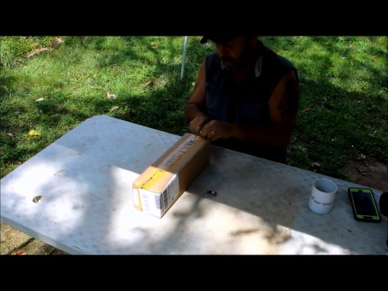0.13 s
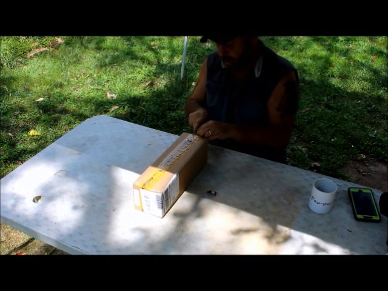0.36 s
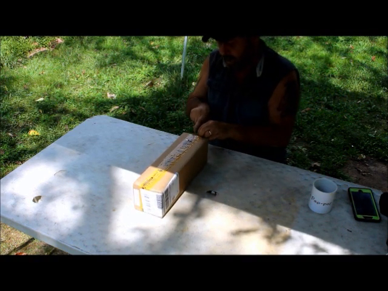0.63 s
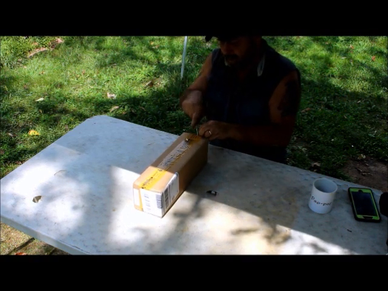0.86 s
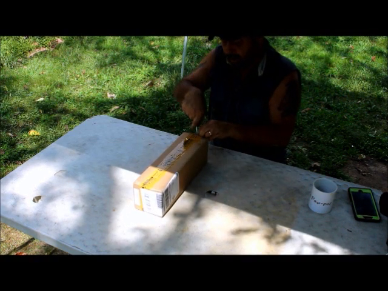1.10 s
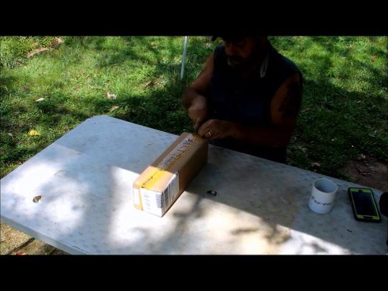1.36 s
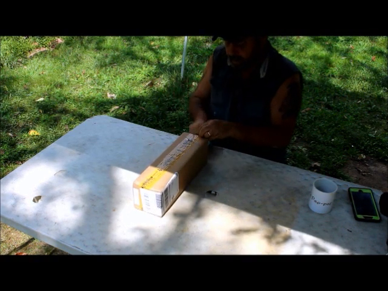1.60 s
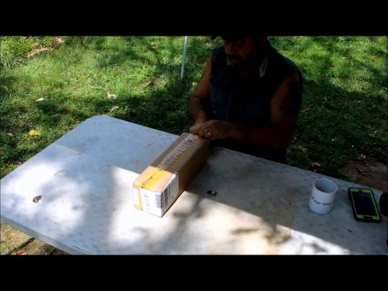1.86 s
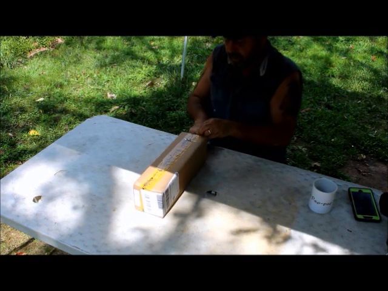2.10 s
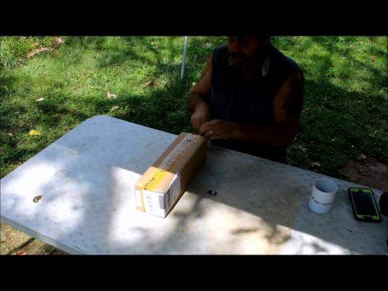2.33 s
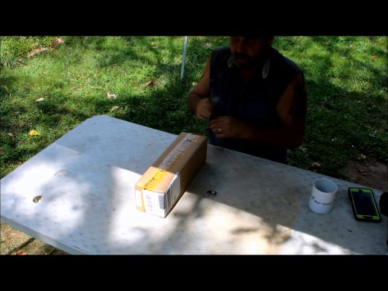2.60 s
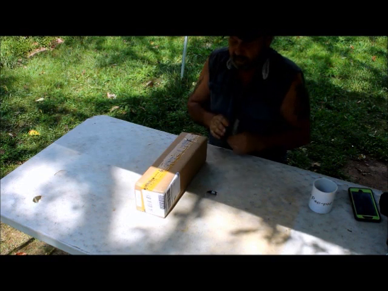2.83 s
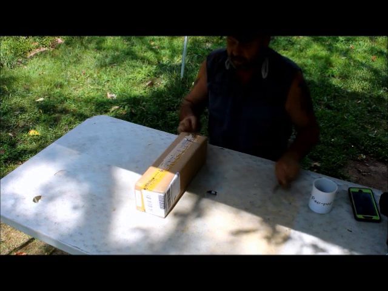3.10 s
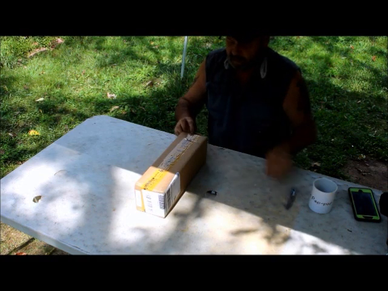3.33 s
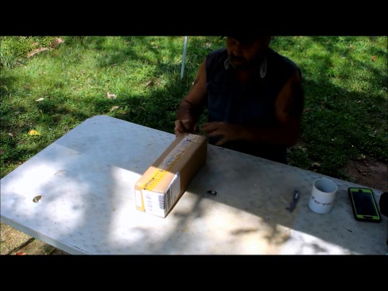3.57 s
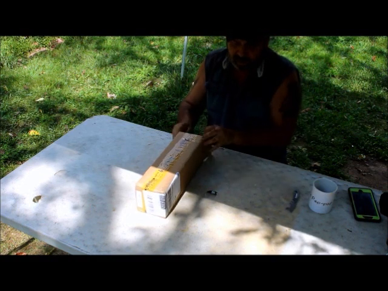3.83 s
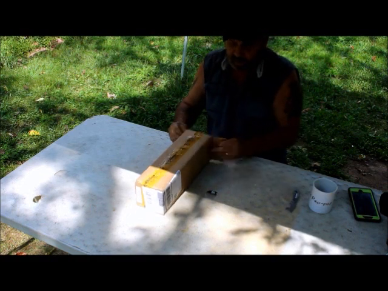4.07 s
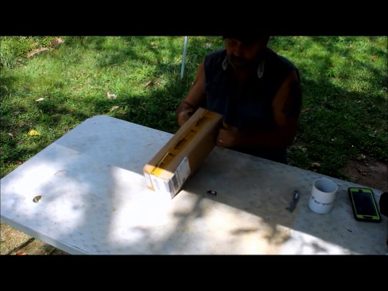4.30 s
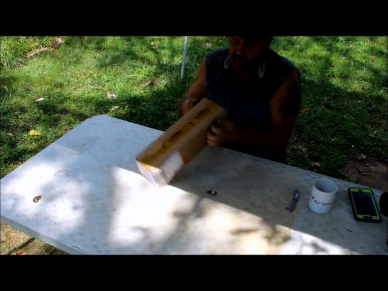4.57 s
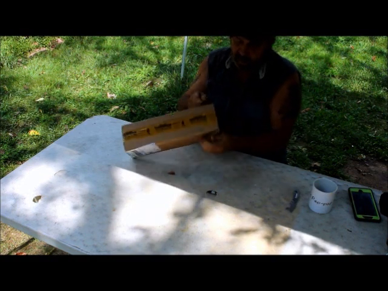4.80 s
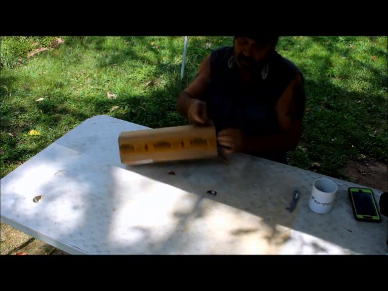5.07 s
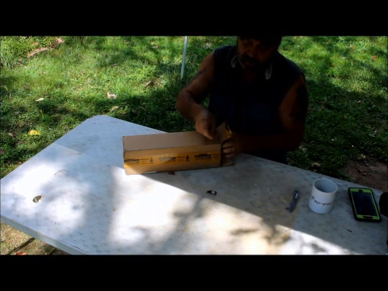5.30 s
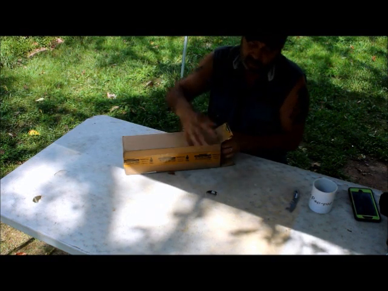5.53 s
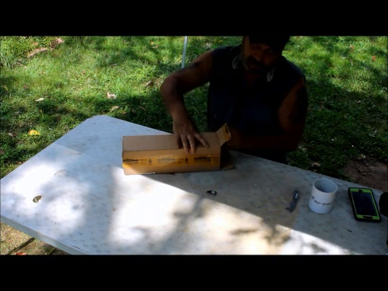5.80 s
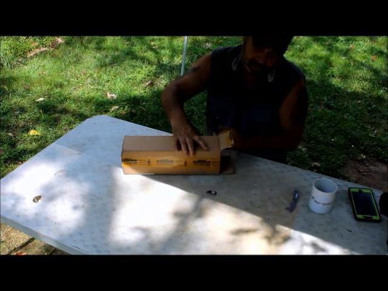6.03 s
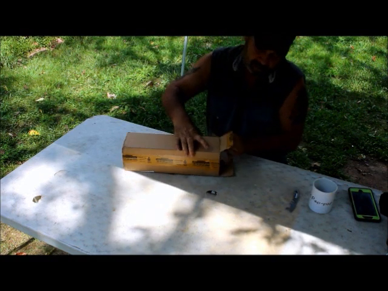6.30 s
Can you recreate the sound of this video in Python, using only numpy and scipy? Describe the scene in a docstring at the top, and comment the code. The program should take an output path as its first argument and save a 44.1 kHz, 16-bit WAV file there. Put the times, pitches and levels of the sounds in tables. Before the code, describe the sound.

Close and dry, outdoors: a blade makes short rasping cuts and hollow knocks in a taped cardboard box on a plastic folding table, with one very loud stab. The knife is dropped and rattles briefly. The box is then scraped, turned over and set down with a boomy thud, and its flaps are tugged with papery crackle. Crickets, ticking katydids and a rising cicada run behind, over faint distant traffic.

```python
"""Outdoors: crickets, a buzzing katydid, a swelling cicada and far traffic (noise bands) fill the air.
Over them a cardboard box on a plastic folding table is knocked, stabbed and slit with a knife, the knife
is dropped, the box dragged and turned over, its flaps pulled; a nearer katydid files pulses. Blows and
stick-slip clicks drive damped modes; paper crackle is filtered clicks. The recorder ducks after loud blows
and limits peaks by clipping."""
import sys
import numpy as np
from scipy import signal
from scipy.fft import rfft, irfft
from scipy.io import wavfile
from scipy.ndimage import uniform_filter1d

SR = 44100
rng = np.random.default_rng(int(sys.argv[2]) if len(sys.argv) > 2 else 0)


def voltage_ratio(decibels):
    """Convert decibels (scalar or array-like) to amplitude ratios, 20 dB per decade."""
    exponent = np.asarray(decibels, float) / 20
    return 10 ** exponent


def to_wav(s):
    """Save 16-bit WAV."""
    ch = np.atleast_2d(s).T  # columns
    pcm = np.round(np.clip(ch, -1, 1) * 32767)  # PCM
    wavfile.write(sys.argv[1], SR, pcm.astype(np.int16))


N = 282681
TIME_S = np.arange(N) / SR

# insect swells: t/s, cricket chorus level/dB, cicada level/dB
INSECTS = [(0.0, -55.5, -61.5), (1.4, -54, -58), (2.5, -53.5, -54.5), (3.7, -54, -50.5),
           (4.7, -54.5, -45.5), (5.7, -51, -43.5), (6.41, -55, -42.5)]
# cicada resonances: f/Hz, width/Hz, relative level/dB
CICADA = [(3590, 270, -6.5), (4790, 2360, -0.5), (5600, 920, -5.5), (6570, 1300, -2.5), (7560, 800, -3),
          (8070, 2100, -3.5)]
# buzzing katydid: t/s, level/dB
FAR_KATYDID = [(0, -61.5), (3.3, -62), (5.7, -56.5), (6.41, -63)]
# its beat, slowing a little: t/s, buzzes begun/count
BUZZ_COUNT = [(-.025, 0), (1.06, 8), (2.32, 17), (3.155, 23), (3.59, 26), (5.48, 39), (6.5, 46)]
# four-pulse katydid: t/s, level/dB
NEAR_KATYDID = [(1.0584, -45.5), (1.2474, -43.5), (1.4624, -43.5), (1.6811, -43), (1.8996, -43),
                (2.139, -47), (2.367, -41), (2.5713, -42), (2.793, -41.5), (3.019, -42), (3.29, -45),
                (3.538, -44), (3.794, -43), (4.019, -41.5), (4.2647, -40.5), (4.4976, -43), (4.7404, -43),
                (4.967, -42), (5.1931, -40.5)]
# pulse starts within one call: t/s
PULSE_S = [0, .0105, .021, .0345]
# traffic and air spectrum: f/Hz, relative level/dB per Hz
AIR = [(15, -54), (25, -8), (114, -0.5), (263, 0), (714, -9.5), (2550, -17.5), (3920, -19.5), (4740, -18.5),
       (5430, -16.5), (9840, -22), (11000, -32), (14800, -38.5), (16000, -70)]
# box standing on the table top: f/Hz, relative level struck/dB, t60/s, relative level rubbed/dB
BOX_MODES = [(89, 19.5, 0.064, 4.5), (117, 7, 0.24, -2), (127.8, -4.5, 0.43, -2.5), (152, 0, 0.15, -2),
             (174, -4, 0.1, -23), (228, 16, 0.11, 6), (273, 8.5, 0.21, -1.5), (314.8, -21, 0.25, -9),
             (369, -14, 0.081, -4), (407, -1.5, 0.069, 4.5), (456, -1, 0.17, -3), (522, 8.5, 0.034, 5),
             (582.6, -24, 0.085, -4.5), (659, -1.5, 0.06, -8), (738, 1, 0.03, 0), (873, -0.5, 0.026, -1),
             (985, -15.5, 0.023, -3.5), (1091, -13.5, 0.051, -10), (1205, -16, 0.018, -10),
             (1428, 8, 0.013, 4), (1615, 1.5, 0.018, 1), (1840, 6, 0.015, 7.5), (2036, -23, 0.022, 9),
             (2303, -8, 0.044, 0.5), (2634, 0.5, 0.018, 0), (2936, -52, 0.052, 0), (3750, -1.5, 0.016, -7)]
# table top under the knife: f/Hz, relative level/dB, t60/s
TABLE_MODES = [(147, 0, 0.047), (214, -18, 0.11), (233, 19, 0.069), (337, 6, 0.14), (394, 7, 0.24),
               (462, 15, 0.061), (554, 14, 0.087), (654, 14.5, 0.01), (755, 12, 0.057), (876, 16.5, 0.021),
               (1030, 4.5, 0.038), (1165, -1, 0.035), (1285, -8.5, 0.036), (1468, -10.5, 0.061),
               (1704, -9, 0.025), (1920, 0.5, 0.0095), (2250, 3, 0.016), (2475, 1.5, 0.022),
               (2700, -6, 0.026), (2980, -9, 0.029), (3120, -15, 0.03), (3500, -4.5, 0.0071),
               (3980, -9, 0.018), (4200, -16, 0.016), (4520, 2, 0.0069), (5100, -9, 0.0097)]
# blows on the box: t/s, relative wall ring/dB, hardness (edges over walls)/dB,
# weight (boom over walls)/dB, relative crack/dB
KNOCKS = [(0.0534, -45, 7, -18, -31), (1.2137, -36, 5, -12, -50), (1.3174, -40, 7.5, -15, -36),
          (1.3808, -52, -8, -11, -34), (1.4317, -36, 4, -1, -53), (1.509, -49, 8, -1, -29.5),
          (1.5374, -30.5, -25, -8, -42), (1.6851, -23.5, -3, -15, -21), (1.9403, -29.5, 3.5, -21, -26),
          (2.0522, -44, -1, 4, -32), (2.1404, -24, 1, 8, -21.5), (2.147, 4, -4.5, -16, -14.5),
          (2.1568, -21.5, 10, 10, -33), (2.1619, -20, 9.5, 1.5, -22), (2.3524, -23.5, -10, -2.5, -37),
          (2.3853, -30.5, -12, -9, -30), (2.4648, -53, 13, 14, -31.5), (2.5254, -49, 14, 4, -46),
          (2.5814, -48, 16, 4.5, -45), (2.6592, -48, 15, 2, -42), (3.0214, -56, 23, -5, -45),
          (3.706, -41.5, -11, 0, -45), (3.81, -23, -4, 0, -21), (4.3327, -30, -18, -23, -27),
          (4.5084, -13.5, -8, -25, -26), (4.5529, -29.5, 0, -20, -45), (5.1658, -34.5, -3, -3, -32),
          (5.2053, -27.5, 0, -15, -42), (5.7853, -32.5, 2, -15, -26), (5.8574, -24.5, -12, -25, -22),
          (5.878, -25, -4, -18, -17), (5.8996, -44, 3, -13, -36), (5.9177, -32, -5, -22, -16.5),
          (5.9588, -38, 7, -13, -25), (6.001, -27.5, -4, -15, -20.5), (6.2291, -37.5, 8, -5, -34)]
# turned box lands flat and rocks: t/s, wall ring/dB, hardness/dB, weight/dB, crack/dB, as KNOCKS
LANDINGS = [(5.2539, -12, -6.5, -4.5, -35), (5.2866, -36.5, 14, 6, -21), (5.3105, -58, 11, -1, -40),
            (5.3447, -19, -9, 1, -36), (5.3809, -33, 9.5, 1.5, -30)]
# knife lands and rattles to rest: t/s, wall ring/dB, hardness/dB, weight/dB, crack/dB, as KNOCKS
DROPS = [(3.3015, -4.5, 0.5, -12, -8.5), (3.3357, -23.5, -14, 6, -29), (3.3416, -17.5, 0, -25, -23),
         (3.3548, -8, -6, -28, -29), (3.3663, -18.5, 4, -18, -18.5), (3.3784, -15, -25, -6, -27),
         (3.3885, -18.5, 2, -7, -29), (3.4232, -11.5, 0, -4, -15.5), (3.4444, -19.5, -5, -25, -31),
         (3.463, -29.5, 3, 4, -44), (3.5236, -33, -5, 1, -26)]
# limits between mode groups, struck (deep boom, boom, wall, edge): f/Hz
STRUCK_EDGES_HZ = [170, 280, 1250]
# limits between mode groups, rubbed (deep boom, boom, long wall, short wall, edge): f/Hz
RUBBED_EDGES_HZ = [170, 280, 670, 1250]
# paper crackle spectrum: f/Hz, relative level/dB per Hz
CRACKLE = [(2500, -3), (3300, -2), (4600, -3), (7000, -5.5), (9000, -6.5), (11000, -12), (13000, -19.5),
           (15500, -38)]
# blade through tape and board: start t/s, hold/s, relative level/dB, brightness/dB, weight/dB
# (the last two scaled per part by the shares below)
CUTS = [(1.215, 0.031, -41.5, 4, -5), (1.29, 0.038, -50.5, 4, -10), (1.35, 0.066, -49.5, 1, -9),
        (1.425, .015, -29.5, -12.5, -10), (1.455, 0.027, -46, -6, -9), (1.51, .005, -50, 4, -8),
        (1.555, 0.015, -45, -14, 4), (1.688, 0.03, -32, 3, -11), (1.715, 0.017, -32.5, .4, 5),
        (1.905, 0.021, -48, 7, -8), (1.93, 0.025, -28, -1, -10), (2.058, 0.0075, -40.5, 1.5, -16),
        (2.134, 0.0065, -39, 2.5, -15), (2.17, 0.015, -39.5, 0, -9), (2.32, .015, -37.5, -11, -3),
        (2.347, 0.035, -29.5, -15, -8.5), (2.524, .005, -53, 14, -8), (2.598, .008, -49, 11.5, -5),
        (2.666, 0.0056, -53.5, 13, -9), (3.02, 0.068, -62.5, 20.5, -2)]
# knife and box shift on the table top: start t/s, hold/s, level/dB, brightness/dB, weight/dB, as CUTS
DRAGS = [(1.12, 0.4, -63, 2, 1), (1.75, 0.25, -54, 0, 12.5), (2.3, 0.78, -66.5, 14, 14),
         (3.47, 0.017, -29, -25, -29), (3.52, 0.13, -45.5, -13, -2), (4.2, .09, -38.5, 5.5, -20),
         (4.31, 0.09, -38, 6.5, -21), (4.42, .03, -58, 6, 5), (4.46, 0.047, -51, 20, -3),
         (4.53, 0.13, -49.5, 15, 4.5), (4.645, 0.047, -39.5, 6.5, -5), (4.715, 0.035, -35.5, 4.5, 8),
         (4.765, 0.074, -29, -2.5, -8), (4.84, 0.023, -34.5, -6, 3), (4.885, 0.025, -44.5, 1, 12),
         (4.87, 0.055, -56, 11, .3), (4.95, 0.092, -52.5, -10, 12), (5.0, 0.011, -53, 16.5, -3),
         (5.09, 0.034, -50, 0, 5), (5.135, .06, -45.5, -8, -6), (5.2, 0.043, -38.5, -1, -11),
         (5.285, 0.0095, -42, 15, 4), (5.305, 0.02, -37, 3.5, 10.5), (5.36, 0.033, -42, 4.5, 7),
         (5.48, 0.019, -48.5, 4, 8.5), (5.55, 0.03, -48.5, -8, 9)]
# fingers work tape and flaps: start t/s, hold/s, level/dB, brightness/dB, weight/dB, as CUTS
PULLS = [(3.745, 0.041, -45, -0.2, -9), (3.83, .13, -51, 0.5, -0.5), (4.03, 0.023, -50.5, 5.5, -7),
         (4.05, 0.072, -55.5, 7, -1), (4.155, 0.0056, -54, 12, -5), (5.73, 0.1, -52, 9, 6),
         (5.81, 0.026, -47, -3, -5), (5.855, 0.058, -40.5, 0, -5), (5.912, 0.01, -41, -4, 5),
         (5.955, 0.012, -46, 6, 0), (6.005, 0.022, -47.5, 8, 4), (6.05, 0.023, -47.5, 3, 4),
         (6.09, 0.035, -45, -7.5, 8.5), (6.16, .02, -48, -4, 12.5), (6.21, 0.088, -46.5, -5, 3.5),
         (6.32, 0.037, -56.5, 4, 3), (6.385, .03, -54, 8.5, 7)]
# per kind of stroke: rise/(dB/s), fall/(dB/s),
# [paper crackle, deep boom, boom, long wall, short wall, edge] relative level/dB
CUT_TOUCH = 820, 1060, [-21, -1.5, -0.5, -0.5, -3.5, -11]
DRAG_TOUCH = 430, 245, [-21.5, -2, -5.5, -1, -7, -9]
PULL_TOUCH = 550, 880, [-10, -5.5, -3.5, -1, -4.5, -6]
# how far each of those six parts follows brightness, and weight: share/1
BRIGHT_SHARE = [.8, 0.071, 0.038, 0, 0.57, 0.72]
WEIGHT_SHARE = [0, 0.93, 0.74, 0.11, 0.19, 0.15]


def unit(x):
    """Scale to rms 1."""
    return x / np.sqrt(np.mean(x ** 2))


def colour(x, points):
    """Shape a spectrum by (f/Hz, level/dB) points, interpolated over log frequency."""
    hz, db = np.transpose(points)
    log_f = np.log(np.arange(N // 2 + 1) * SR / N + 1)
    return irfft(rfft(x) * voltage_ratio(np.interp(log_f, np.log(hz), db)), N)


def ring(x, hz, t60_s):
    """One damped mode: each impulse starts a decaying sine."""
    pole = np.exp(2j * np.pi * hz / SR - np.log(1000) / (t60_s * SR))
    return signal.lfilter([1], [1, -pole], x).imag


def band(hz, width_hz):
    """Noise of rms 1 through one resonance twice."""
    t60_s = np.log(1000) / (np.pi * width_hz)
    once = ring(rng.standard_normal(N), hz, t60_s)
    return unit(ring(once, hz, t60_s))


def walk(rate_hz):
    """Slow random wander of rms 1: noise averaged twice."""
    k = int(SR / rate_hz)
    return unit(uniform_filter1d(uniform_filter1d(rng.standard_normal(N), k), k))


def low_cut(x, hz):
    """Steep high-pass."""
    return signal.sosfilt(signal.butter(4, hz, "high", fs=SR, output="sos"), x)


def fade(x, tau_s):
    """Every impulse dies away exponentially."""
    return signal.lfilter([1], [1, -np.exp(-1 / (tau_s * SR))], x)


def slips(rate_hz, spread_db):
    """Stick-slip clicks at random moments, mostly small, a few large; rms 1."""
    spreads = np.minimum(rng.exponential(size=N), 5.5)  # caps the largest slip
    size = voltage_ratio(spread_db * spreads) * rng.choice([-1, 1], N)
    return unit(size * (rng.random(N) < rate_hz / SR))


def shares(hz, db, edges_hz):
    """Group of each mode as a part column (deep boom = 2), and its amplitude share of the group's power."""
    group = 2 + np.searchsorted(edges_hz, hz)
    total = np.sqrt([np.sum(voltage_ratio(db[group == g]) ** 2) for g in group])
    return group, voltage_ratio(db) / total


def chorus():
    """Many crickets blur into one wavering band; the cicada rasps over several resonances."""
    s, cricket_db, cicada_db = np.transpose(INSECTS)
    crickets = voltage_ratio(0.73 * walk(7.9) + 1.3 * walk(80)) * band(4710, 750)
    cicada = unit(sum(voltage_ratio(db + 1.9 * walk(41)) * band(hz, width_hz) for hz, width_hz, db in CICADA))
    cricket_gain = voltage_ratio(np.interp(TIME_S, s, cricket_db))
    cicada_gain = voltage_ratio(np.interp(TIME_S, s, cicada_db))
    return cricket_gain * crickets + cicada_gain * cicada


def far_katydid(duty=0.39):
    """Resonant noise gated on a nearly even beat."""
    beat = np.interp(TIME_S, *np.transpose(BUZZ_COUNT))
    gate = uniform_filter1d(1. * (beat % 1 < duty), int(0.012 * SR))
    effort_db = np.interp(TIME_S, *np.transpose(FAR_KATYDID)) + 0.68 * walk(8.1) + 0.74 * walk(150)
    return gate * voltage_ratio(effort_db) * band(9830, 440)


def traffic_air(level_db=-48.5):
    """Far traffic and air: shaped noise whose level drifts."""
    return voltage_ratio(level_db + 0.7 * walk(3)) * unit(colour(rng.standard_normal(N), AIR))


def parts(rows, deep_db):
    """Blow rows as t/s, then crack, deep boom, boom, wall, edge in dB; deep_db is deep boom over boom."""
    s, wall, hard, weight, crack = np.transpose(rows)
    boom = wall + weight
    return np.transpose([s, crack, boom + deep_db, boom, wall, wall + hard])


def blows(events, modes, crack_s, chatter_s, chatter_db, contact_s, lag_s):
    """A crack opens each blow; modes follow after lag_s in a mix of their own, and loose parts chatter on."""
    events, modes = np.array(events), np.array(modes)
    at = (events[:, 0] * SR).astype(int)
    scatter_db = 2.5 * rng.standard_normal((len(at), len(modes)))
    chatter = voltage_ratio(chatter_db) * slips(4000, 2.88) / np.sqrt(chatter_s * SR / 2)
    body = np.zeros(N)
    groups, mode_shares = shares(modes[:, 0], modes[:, 1], STRUCK_EDGES_HZ)
    for k, (group, share) in enumerate(zip(groups, mode_shares)):
        push = np.zeros(N)
        push[at + int(lag_s * SR)] = share * voltage_ratio(events[:, group] + 0.5 + scatter_db[:, k])
        side = 1 if k % 3 == 2 else -1  # modes start with opposite signs
        loose = np.roll(chatter, rng.integers(N))  # other clicks for each mode
        drive = fade(push, chatter_s) * loose + side * push
        body += ring(drive, modes[k, 0], modes[k, 2])
    contact = np.hanning(int(contact_s * SR) + 3)  # finite push rounds the first edge
    snap = np.zeros(N)
    snap[at] = voltage_ratio(events[:, 1])
    swell = uniform_filter1d(fade(snap, crack_s), int(0.0031 * SR) + 1)
    crack = voltage_ratio(-6.5) * swell * unit(colour(slips(8000, 2.5), CRACKLE))
    return np.convolve(body, contact / contact.sum())[:N] + crack


def box_blows():
    """Knocks and landings ring the box modes."""
    hits = np.vstack([parts(KNOCKS, -15.5), parts(LANDINGS, 11.5)])
    return blows(hits, BOX_MODES, crack_s=0.005, chatter_s=0.0065, chatter_db=-1.9,
                 contact_s=0.00031, lag_s=0.0012)


def near_katydid(start_hz=9575.28, fall_hz_per_s=74880, step_db=0.7):
    """Four short sine pulses per call, each falling in pitch and step_db louder than the last."""
    out, t = np.zeros(N), np.arange(int(0.0075 * SR)) / SR
    cycles = start_hz * t - fall_hz_per_s / 2 * t ** 2
    pulse = np.sin(np.pi * t / t[-1]) * np.sin(2 * np.pi * cycles)
    for s, db in NEAR_KATYDID:
        for k, lag_s in enumerate(PULSE_S):
            i = int((s + lag_s) * SR)
            out[i:i + len(t)] += voltage_ratio(db + step_db * (k - 1.5)) * pulse
    return out


def strokes(rows, rise_db_s, fall_db_s, touch_db):
    """Power of each part: a stroke swells, holds and dies away."""
    power = np.zeros((len(touch_db), N))
    for s, hold_s, db, bright, weight in rows:
        first = max(int((s - 60 / rise_db_s) * SR), 0)  # 60 dB down at both ends
        near = slice(first, int((s + hold_s + 60 / fall_db_s) * SR))
        t = TIME_S[near]
        shape_db = db - rise_db_s * np.maximum(s - t, 0) - fall_db_s * np.maximum(t - s - hold_s, 0)
        mix_db = np.array(touch_db) + bright * np.array(BRIGHT_SHARE) + weight * np.array(WEIGHT_SHARE)
        power[:, near] += np.outer(voltage_ratio(mix_db), voltage_ratio(shape_db)) ** 2
    return power


def rubbing(hand_t60_s=0.62, wander_db=2, wander_hz=19.6):
    """Slips shake the box, whose ring the hands shorten; the paper skin crackles on top."""
    power = strokes(CUTS, *CUT_TOUCH) + strokes(DRAGS, *DRAG_TOUCH) + strokes(PULLS, *PULL_TOUCH)
    gains = uniform_filter1d(np.sqrt(power), int(0.0034 * SR))
    # the grip moves: each part swells and fades alone
    gains = gains * [voltage_ratio(wander_db * walk(wander_hz)) for _ in gains]
    grip = voltage_ratio(0.22 * walk(66))  # pressure comes in jerks
    shake, modes, body = grip * slips(4000, 4.0), np.array(BOX_MODES), 0
    groups, mode_shares = shares(modes[:, 0], modes[:, 3], RUBBED_EDGES_HZ)
    for (hz, _, free_t60_s, _), group, share in zip(modes, groups, mode_shares):
        t60_s = 1 / (1 / free_t60_s + 1 / hand_t60_s)
        build_up = np.sqrt(t60_s * SR / (4 * np.log(1000)))  # rms the mode reaches
        body = body + share / build_up * ring(gains[group - 1] * shake, hz, t60_s)
    crackle = voltage_ratio(14) * gains[0] * grip * unit(colour(slips(9000, 3.9), CRACKLE))
    return body + crackle


def knife_drop():
    """The falling knife rings the table-top modes and rattles to rest."""
    return blows(parts(DROPS, -23), TABLE_MODES, crack_s=0.0022, chatter_s=0.013, chatter_db=-2.5,
                 contact_s=0.0001, lag_s=0.00028)


def yard_echo(work):
    """Faint scatter of echoes: decaying noise as impulse response, starting after 12 ms."""
    t = TIME_S[:int(0.4 * SR)]
    yard = rng.standard_normal(len(t)) * voltage_ratio(-60 * t / 0.31) * (t > 0.012)
    return voltage_ratio(-50) * signal.fftconvolve(work, yard)[:N]


def scene():
    """Hands at work with yard echoes, over insects and far traffic."""
    insects = chorus() + far_katydid() + near_katydid()
    # box and table are too small to radiate deep bass
    work = low_cut(box_blows() + rubbing(), 108.4) + low_cut(knife_drop(), 165)
    return (work + yard_echo(work) + traffic_air() + insects)[None]


def roll_off(x):
    """The treble ends steeply here."""
    return signal.sosfilt(signal.butter(12, 16340, fs=SR, output="sos"), x)


def record(dry, top_db=-24, squeeze=0.16, release_s=0.21):
    """Gain control turns everything down after loud blows; peaks beyond full scale clip."""
    power = signal.lfilter([1 / (release_s * SR)], [1, -np.exp(-1 / (release_s * SR))], dry ** 2)
    gain = (1 + power / voltage_ratio(2 * top_db)) ** (-squeeze / 2)
    mix = np.clip(gain * dry, -1, 1)
    return roll_off(mix)


dry = scene()
out = record(dry)
to_wav(out)
```